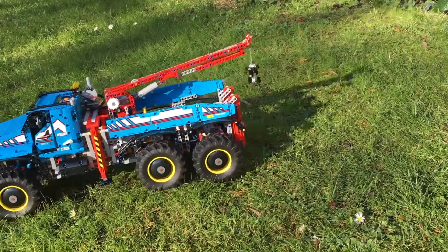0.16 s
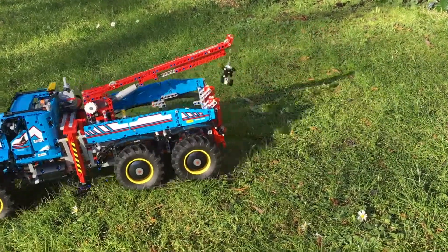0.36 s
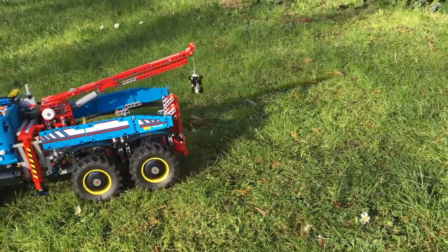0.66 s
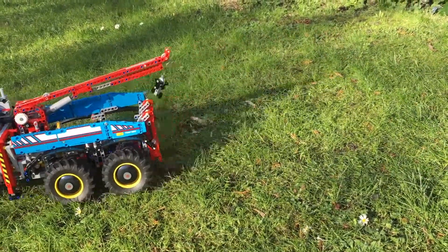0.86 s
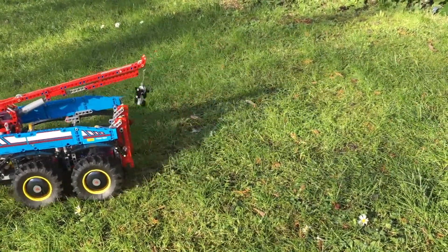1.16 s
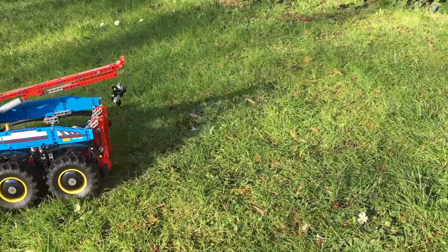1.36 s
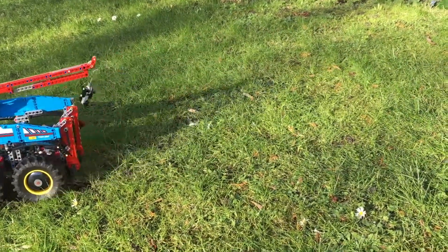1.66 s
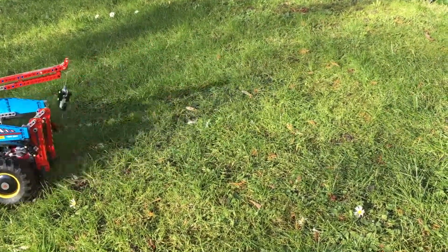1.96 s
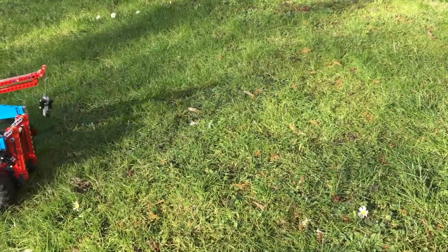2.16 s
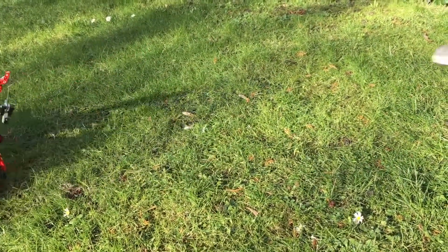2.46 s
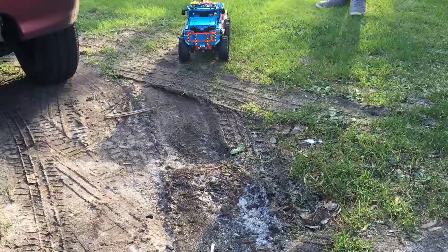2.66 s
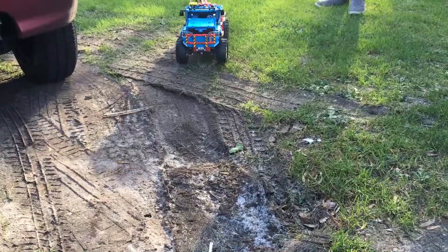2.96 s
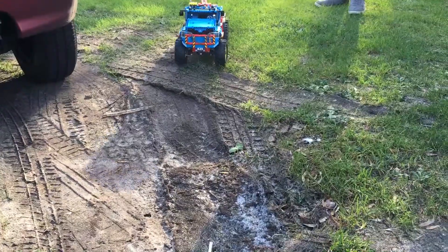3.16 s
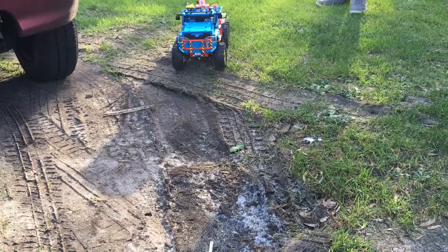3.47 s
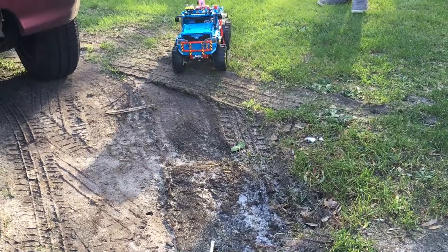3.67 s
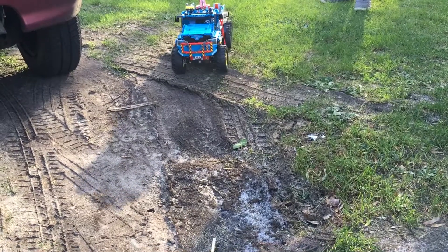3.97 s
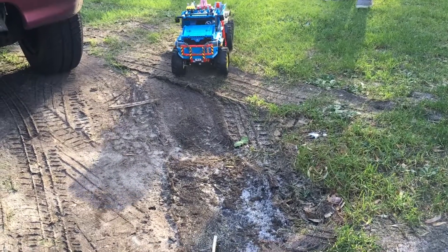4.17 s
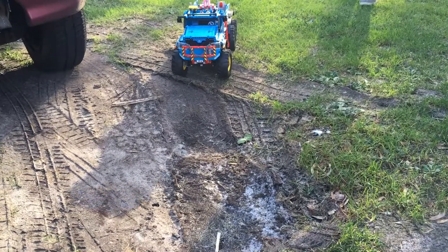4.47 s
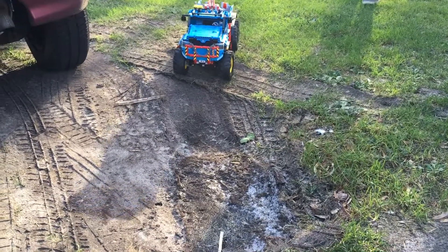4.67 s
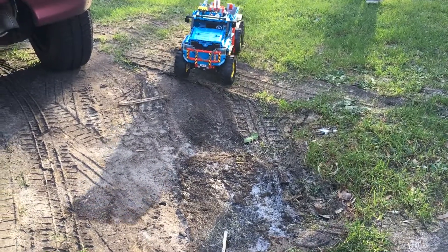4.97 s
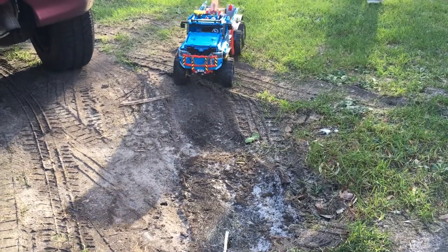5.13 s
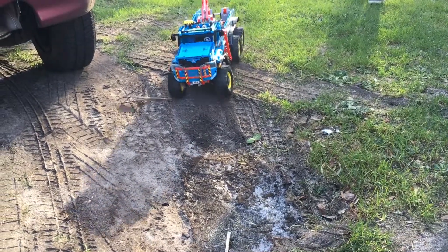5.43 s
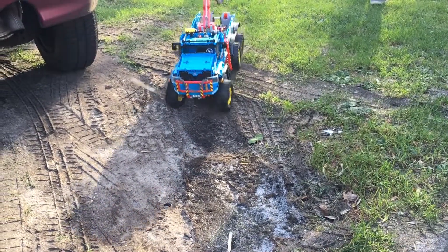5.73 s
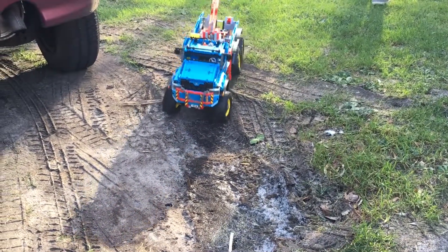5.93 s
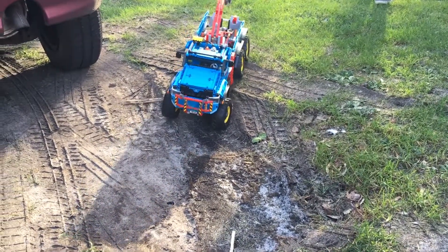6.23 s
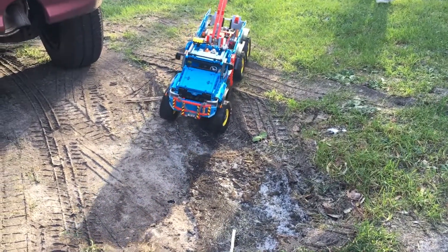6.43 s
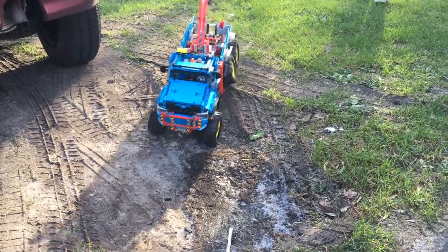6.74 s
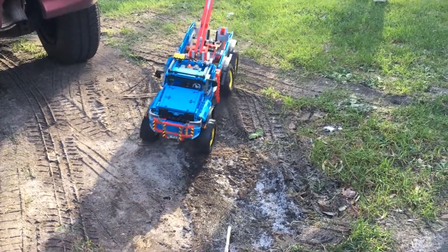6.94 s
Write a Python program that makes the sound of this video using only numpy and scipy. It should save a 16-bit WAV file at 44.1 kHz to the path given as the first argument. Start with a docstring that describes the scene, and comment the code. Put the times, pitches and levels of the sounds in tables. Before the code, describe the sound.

High bird trills and warbled chirps, near and far, above faintly whirring plastic gears, a soft hollow knock and low outdoor rumble.

```python
"""First comes a bird some way off in a garden, singing falling trills that end in a flourish. A near bird
then rocks between a warbled high note and an arched low one, and the first bird sings again. Others chip
and whistle in the trees. Each note is an almost pure, sliding tone from the bird's voice box, plus echoes.
Early on, something hollow gives one dull knock. A toy truck's plastic gears hiss faintly over a low
outdoor rumble, which turns suddenly deeper part-way through."""
import sys
import numpy as np
from scipy import signal
from scipy.fft import rfft, irfft
from scipy.io import wavfile
from scipy.ndimage import uniform_filter1d, minimum_filter1d

SR = 44100
rng = np.random.default_rng(int(sys.argv[2]) if len(sys.argv) > 2 else 0)


def transcribe(u):
    """Save the signal u as a 16-bit wav file named by the first command-line argument.

    u: samples, shape (n,) or (channels, n), limited to [-1, 1]; the rate is SR.
    q: integer samples, one column per channel.
    """
    v = np.clip(np.atleast_2d(u).T, -1, 1)
    q = np.round(v * 32767).astype(np.int16)
    wavfile.write(sys.argv[1], SR, q)


N = 313110
TIME = np.arange(N) / SR

# Levels in the tables are relative: each source also sets its own loudness.
# Shapes of smooth notes, timed from the note's main moment: t/s, level/dB as the last column, with
# f/Hz between them.
ARCH_SHAPE = [(-.054, 2900, -11), (-.04, 2990, -8.5), (-.027, 3300, 4), (-.013, 3650, 4), (0, 3853, 9),
              (.012, 3680, -2.5), (.018, 3050, -3.5), (.024, 2100, -26)]
TAG_SHAPE = [(-.019, 2270, -13.5), (-.008, 2690, -0.5), (.002, 2880, -1), (.02, 2830, -9.5)]
GLIDE_SHAPE = [(-.003, 5166, -2.5), (.009, 4750, 1.5), (.02, 4396, 2), (.034, 4332, -1), (.046, 4270, -9),
               (0.052, 3600, -11)]
DROP_SHAPE = [(-.007, 4630, -1.5), (-.003, 3645, 0.5), (.001, 3026, 0.5), (.012, 2687, -1.5),
              (.016, 2275, -13), (.024, 1570, -15.5)]
CHIP_SHAPE = [(-.015, 3490, -6), (-.007, 4880, 0), (0, 5790, -2.5), (.007, 4970, 1), (.022, 2880, -5.5)]
SEESAW_SHAPE = [(-.012, 4715, -13), (0, 5150, -4.5), (.018, 5600, 0.5), (.026, 7200, -9), (.05, 5880, -5)]
# Shapes of buzzy notes, whose pitch zigzags: t/s, f/Hz, level/dB, zigzag depth/Hz
LISP_SHAPE = [(-.045, 6900, -6, 500), (-.026, 6620, 1, 600), (-.018, 6260, -7, 500), (-.014, 3990, -9, 0),
              (0, 6200, 2, 0), (.007, 5400, 2, 150), (.018, 4700, -8, 200)]
RISE_SHAPE = [(-.02, 4605, -5.5, 400), (-.007, 4520, -6.5, 250), (0, 5300, 4, 100), (.007, 5570, -4, 300)]
SLUR_SHAPE = [(-.052, 5680, -6, 652), (-.036, 5150, -4, 704), (-.026, 4360, -1, 204),
              (-.004, 3170, -2.5, -2), (.003, 2640, -23.5, 0), (.006, 3440, -6, 0), (.014, 3860, 0.5, 145),
              (.026, 4050, -15, 150)]
FLOURISH_SHAPE = [(-.05, 5500, -17, 1280), (-.022, 6770, -14, 1190), (-.012, 4782, -15, 300),
                  (-.006, 3718, -17, 100), (.004, 4310, -6.5, 420), (.03, 3677, -10.5, 494),
                  (.06, 3200, -13.5, 453), (.12, 2894, -21, 280), (.16, 2820, -26, 200)]
# The near bird's high notes: t/s, level/dB, pitch factor, zigzag length/s, zigzag depth/Hz
HIGH_NOTES = [(2.875, -23, 0.97, 0.041, 860), (3.24, -22, .985, 0.059, 1290),
              (3.592, -23.5, 1.132, 0.044, 1400), (3.973, -27, 1.094, 0.049, 1320)]
# Single notes: t/s, level/dB, pitch factor, length factor
ARCH_NOTES = [(2.693, -30.5, 1, 0.65), (3.037, -28, 0.95, 0.89), (3.40, -24, 1, 0.92),
              (3.753, -24.5, 1.08, 1.12), (4.139, -26.5, 1.078, 1)]
TAG_NOTES = [(2.736, -39.5, 0.86, 0.84), (3.083, -40.5, 0.8, 1), (3.449, -27.5, .99, 0.96),
             (3.804, -32, 1.07, 1.3), (4.196, -34.5, 1.004, 1.7)]
CHIP_NOTES = [(1.377, -40.5, 0.98, 0.91), (1.974, -41, 1.48, 0.37), (2.033, -44, 1.2, 0.32)]
# The flourish that ends each far song: t/s, level/dB
FLOURISH_NOTES = [(1.075, -23.5), (6.85, -23.5)]
# Trills: first t/s, last t/s, note count, growth of each gap, level/dB, level change/dB, pitch factor
LISP_RUNS = [(4.472, 4.729, 3, -0.044, -40.5, 8.4, 1.01)]
RISE_RUNS = [(4.83, 5.084, 5, 0.013, -33, -1.5, 1.01)]
SLUR_RUNS = [(.047, .306, 3, -0.0058, -28.5, -2.5, 1), (5.199, 6.092, 8, 0, -27.5, -0.44, 1.027)]
DROP_RUNS = [(.381, .936, 9, 0.013, -38, 0.5, 0.99), (6.172, 6.72, 9, .027, -34.5, -4, 1)]
SEESAW_RUNS = [(.815, 1.797, 14, 0.0091, -53.5, 2.1, 1)]
# Held notes from the trees: t/s, length/s, first f/Hz, last f/Hz, level/dB
THIN_NOTES = [(2.2, 0.07, 6400, 6500, -58), (3.14, 0.4, 5780, 5600, -50), (3.163, 0.12, 6760, 6520, -37),
              (3.361, 0.094, 6650, 6680, -44), (5.053, 0.115, 3465, 3350, -51),
              (5.33, 0.23, 2496, 2503, -59.5), (5.82, 0.17, 2420, 2375, -58.5),
              (6.809, 0.28, 2404, 2390, -55.5)]
HOARSE_NOTES = [(2.06, 0.18, 1730, 1694, -63.5), (2.88, 0.22, 1580, 1710, -68),
                (3.52, 0.28, 1564, 1772, -65.5), (4.05, .48, 1740, 1566, -68)]
# The tones a hollow body rings with: f/Hz, level/dB, time to fade by 60 dB/s
BODY_TONES = [(103, -10, 0.17), (145, 1, 0.28), (365, -12.5, 0.22), (810, -15.5, 0.072)]
# Hits of the knock, the truck's loose parts and its tyres on soil: t/s, level/dB
KNOCK_HITS = [(.992, -44.5), (1.117, -34.5), (1.1385, -30), (1.1665, -34.5), (1.266, -42.5)]
TICK_HITS = [(2.03, -49), (2.09, -57), (5.195, -40.5), (6.517, -48), (6.82, -39)]
CRUNCH_HITS = [(5.283, -56.5), (6.69, -51), (6.75, -57.5)]
# Loudness of the gears (how hard the truck drives) and of the early rumble: t/s, level/dB
GEAR_LEVELS = [(0.0, -65), (.15, -58), (.42, -60), (.6, -57), (.78, -60.5), (1.1, -60), (1.25, -69.5),
               (1.4, -59.5), (1.57, -63), (1.7, -60.5), (1.82, -67), (2.06, -62), (2.28, -63.5),
               (2.48, -65.5), (2.85, -61), (3.2, -61), (4.25, -59), (4.6, -62), (5.03, -63.5), (5.3, -56),
               (5.65, -53), (6.27, -54.5), (6.44, -75), (6.6, -55.5), (6.86, -54), (7.1, -55.5)]
EARLY_RUMBLE_LEVELS = [(0.0, -56.5), (0.844, -58), (1.42, -55.5), (1.628, -57.5), (2.042, -52.5),
                       (2.1, -56), (2.444, -56.5), (2.65, -48.5)]
# Pitches at which the gears whirr: f/Hz, width/Hz, level/dB
WHIRR_BANDS = [(6350, 1050, -3), (8640, 1000, -7.5), (12070, 1360, -8.5)]
# Noise colours, or how strong each noise is from low to high: f/Hz, level/dB
THUD_SPECTRUM = [(75, -9.5), (140, 7), (200, -16.5), (400, -14.5), (650, -25), (1000, -34), (2000, -27)]
GEAR_SPECTRUM = [(600, 2), (1100, -7.5), (3000, 9.5), (6000, 8), (7800, -23), (10300, -5), (15500, 0)]
TICK_SPECTRUM = [(1200, -6), (5000, -16), (15000, -1)]
CRUNCH_SPECTRUM = [(350, 7), (800, 4), (2000, 15), (5000, -23)]
EARLY_SPECTRUM = [(52, -13), (80, -6), (144, -1), (222, -6.5), (443, -12.5), (900, -27), (1800, -30.5)]
LATE_SPECTRUM = [(31, -10.5), (52, -3), (113, -9.5), (211, -16.5), (400, -29.5), (775, -39), (1400, -29)]
CHORUS_SPECTRUM = [(1200, -11.5), (2200, -2), (3200, 12.5), (4500, 8), (6200, 0.5), (8000, -5.5),
                   (11000, -65)]
# How alike the noise is in the two ears: f/Hz, likeness from 0 to 1
EAR_LIKENESS = [(400, 1), (1400, 0.99), (3000, 0.32), (6000, 0), (9000, 1)]


def near_bird():
    """High warbles take turns with low arches, each with a short tag; leaves scatter the high ones more."""
    high = sum(sing(warbled(zigzag_s, depth_hz), [(s, db, pitch, 1)],
                    flutter_db=1, waver=.003, overtone_db=-33)
               for s, db, pitch, zigzag_s, depth_hz in HIGH_NOTES)
    low = sing(ARCH_SHAPE, ARCH_NOTES, flutter_db=1.5, waver=.007, overtone_db=-18)
    low += sing(TAG_SHAPE, TAG_NOTES)
    high = garden(high, pan_db=-5, lead_ms=.15, tail_db=-9, early_db=-9)
    return high + garden(low, pan_db=-5, lead_ms=.12, tail_db=-12.5, early_db=-11.5)


def far_birds():
    """One bird runs through trills to a buzzy flourish; a closer one chips between its songs."""
    song = sing(LISP_SHAPE, trill(LISP_RUNS), warble_hz=207, waver=.0221)
    song += sing(RISE_SHAPE, trill(RISE_RUNS), warble_hz=202.4, flutter_db=3, waver=.024)
    song += sing(SLUR_SHAPE, trill(SLUR_RUNS), warble_hz=161.5, flutter_db=3.5, waver=.0147)
    song += sing(FLOURISH_SHAPE, FLOURISH_NOTES, warble_hz=149.8, waver=.0213)
    song += sing(DROP_SHAPE, trill(DROP_RUNS), flutter_db=1, waver=.016)
    song = from_db(-5) * garden(song, pan_db=11, lead_ms=.075, tail_db=-1, early_db=-9)
    chips = sing(CHIP_SHAPE, CHIP_NOTES, flutter_db=3)
    return song + garden(chips, pan_db=6, lead_ms=.061, tail_db=-4, early_db=-6.5)


def seesaw_bird():
    """A faint high trill from farther off, each note sliding up and then down."""
    song = sing(SEESAW_SHAPE, trill(SEESAW_RUNS), waver=.025)
    return garden(song, pan_db=-5, lead_ms=.026, tail_db=-6, early_db=-6.5)


def whistling_birds():
    """Thin whistles and low calls from deep in the trees; a shakier pitch makes the low ones hoarse."""
    song = np.zeros(N)
    for notes, waver in (THIN_NOTES, .014), (HOARSE_NOTES, .05):
        for s, length, first_hz, last_hz, db in notes:
            shape = [(0, first_hz, -12), (length / 4, first_hz, 0), (length, last_hz, -6)]
            song += sing(shape, [(s, db)], waver=waver)
    return garden(song, pan_db=5.5, lead_ms=.053, tail_db=-4.5, early_db=-13.5)


def high_tone(start_s=6.345, end_s=6.7, rise_s=.055, fall_s=.09):
    """A thin, fluttering tone swells, holds and fades."""
    swell = np.clip(np.minimum((TIME - start_s) / rise_s, (end_s - TIME) / fall_s), 0, 1)
    hz = 5390 * (1 + .005 * drift(200))
    return swell * from_db(-52.5 + 3.5 * drift(80)) * np.sin(2 * np.pi * np.cumsum(hz) / SR)


def knock():
    """A few quick, soft hits set a hollow body ringing, each with a dull puff of noise."""
    hits = strikes(KNOCK_HITS)
    body = sum(from_db(db) * ring(hits, hz, t60) for hz, db, t60 in BODY_TONES)
    puff = uniform_filter1d(fade(hits, t60=.39), size=500) * noise(THUD_SPECTRUM)
    thump = from_db(-.5) * body + from_db(-5.5) * puff
    return signal.sosfilt(signal.butter(4, 65, "high", fs=SR, output="sos"), thump)


def toy_truck():
    """Plastic gears hiss and whirr, each whirr coming and going; loose parts tick and tyres crunch."""
    gears = noise(GEAR_SPECTRUM)
    for hz, width_hz, db in WHIRR_BANDS:
        band = signal.lfilter(*signal.iirpeak(hz, hz / width_hz, fs=SR), rng.standard_normal(N))
        gears += from_db(db + 4.74 * drift(7.7)) * rms_one(band)
    flicker_db = 1.38 * drift(150) + .27 * drift(25)
    gears *= level(GEAR_LEVELS) * from_db(3.5 + flicker_db)
    ticks = fade(strikes(TICK_HITS), t60=.035) * noise(TICK_SPECTRUM)
    crunch_gain = fade(strikes(CRUNCH_HITS), t60=.23) * from_db(.76 * drift(410))
    return gears + ticks + crunch_gain * noise(CRUNCH_SPECTRUM)


def rumble(change_s=2.665, blend_s=.0078):
    """A low outdoor rumble suddenly gives way to a deeper one."""
    late_share = np.clip((TIME - change_s) / blend_s + .5, 0, 1)
    early = level(EARLY_RUMBLE_LEVELS) * noise(EARLY_SPECTRUM)
    late = from_db(-57) * noise(LATE_SPECTRUM)
    return (1 - late_share) * early + late_share * late


def distant_chorus():
    """Many far-off birds blur into a soft hiss that swells and sinks."""
    return from_db(-56 + 2.2 * drift(8)) * noise(CHORUS_SPECTRUM)


def sing(shape, notes, warble_hz=72, flutter_db=4, waver=.012, overtone_db=-42):
    """A bird's voice box slides a tone through a shape; a fast muscle tremor can zigzag its pitch."""
    out = np.zeros(N)
    shape_s, *columns = np.transpose(shape)
    for s, db, *factors in notes:
        pitch, length = factors or (1, 1)
        t = np.arange(shape_s[0] * length, shape_s[-1] * length, 1 / SR)
        hz, shape_db, *depth = (np.interp(t / length, shape_s, column) for column in columns)
        flutter, wobble = drift(247, size=len(t)), drift(300, size=len(t))
        zigzag_hz = -sum(depth) * signal.sawtooth(2 * np.pi * warble_hz * t, .5)   # 0 in smooth notes
        phase = 2 * np.pi * np.cumsum(pitch * hz * (1 + waver * wobble) + zigzag_hz) / SR
        # an overtone at three times the pitch shows only where the note is loudest
        overtone_gain = from_db(overtone_db + 3 * (shape_db - shape_db.max())) * (pitch * hz < SR / 8)
        tone = np.sin(phase) + overtone_gain * np.sin(3 * phase)
        soft_edges = signal.windows.tukey(len(t), .08)
        add(out, s + t[0], soft_edges * from_db(db + shape_db + flutter_db * flutter) * tone)
    return out


def warbled(zigzag_s, depth_hz, centre_hz=4840, rise_s=.012):
    """The shape of a high note: the pitch zigzags, narrows and settles into a downward glide."""
    zigzag = [(-zigzag_s, centre_hz, -17, depth_hz),
              (rise_s - zigzag_s, centre_hz, -4, depth_hz),
              (-.014, centre_hz, -1, .7 * depth_hz)]
    return zigzag + [(*point, 0) for point in GLIDE_SHAPE]


def trill(runs, pitch_sag=.04):
    """A bird repeats one note, sinking a little in pitch and never twice quite alike."""
    notes = []
    for first_s, last_s, count, gap_growth, db, change_db, pitch in runs:
        gaps = (1 + gap_growth) ** np.arange(round(count) - 1)
        progress = np.append(0, np.cumsum(gaps)) / gaps.sum()
        chance = 1 + rng.standard_normal((len(progress), 2)) * [.012, .06]
        for part, (detune, length) in zip(progress, chance):
            s = first_s + part * (last_s - first_s)
            notes.append((s, db + part * change_db, pitch * (1 - pitch_sag * part) * detune, length))
    return notes


def garden(x, pan_db, lead_ms, tail_db, early_db, tail_t60=.77, early_t60=.034, echo_pan=.51):
    """Sound reaches the left ear first; ground and walls echo early, and trees scatter a long tail."""
    sides_db = np.array([[pan_db], [-pan_db]]) / 2   # positive pan is louder on the left
    direct = np.array([x, np.interp(TIME - lead_ms / 1000, TIME, x)]) * from_db(sides_db)
    t = np.arange(SR) / SR
    scatter = rng.standard_normal((2, 2, SR)) * (t > .004)   # echoes start after 4 ms
    tail = from_db(tail_db) * rms_one(scatter[0] * from_db(-60 * t / tail_t60))
    early = from_db(early_db) * rms_one(scatter[1] * from_db(-60 * t / early_t60))
    echoes = signal.fftconvolve(x[None], (tail + early) / np.sqrt(SR), axes=1)[:, :N]
    return direct + echoes * from_db(echo_pan * sides_db)


def strikes(hits):
    """One click for each hit."""
    out = np.zeros(N)
    for s, db in hits:
        out[round(s * SR)] += from_db(db)
    return out + 1e-18


def fade(clicks, t60):
    """A loudness curve that jumps at each click, then falls by 60 dB in t60 seconds."""
    return signal.lfilter([1], [1, -np.exp(-np.log(1000) / (t60 * SR))], clicks)


def ring(clicks, hz, t60):
    """Each click starts a pure tone that dies away."""
    decay, step = np.exp(-np.log(1000) / (t60 * SR)), 2 * np.pi * hz / SR
    return signal.lfilter([0, np.sin(step)], [1, -2 * decay * np.cos(step), decay * decay], clicks)


def noise(spectrum):
    """Stereo noise of a given colour and of strength 1, alike in both ears in the bass."""
    hz = np.arange(N // 2 + 1) * SR / N
    alike = np.clip(at_hz(EAR_LIKENESS, hz), 0, 1)
    bass_cut = 1 + (spectrum[0][0] / (hz + 1)) ** 8
    treble_cut = 1 + (hz / spectrum[-1][0] / 1.2) ** 8
    colour = from_db(at_hz(spectrum, hz)) / np.sqrt(bass_cut * treble_cut)
    mid, side = rfft(rng.standard_normal((2, N))) * colour
    return rms_one(irfft(np.sqrt(1 + alike) * mid + np.sqrt(1 - alike) * side * [[1], [-1]], N))


def drift(rate, size=N):
    """A random wander of about 1 either way, turning rate times a second."""
    return np.interp(np.arange(size) / SR * rate, np.arange(8000), rng.standard_normal(8000))


def add(out, start_s, sound):
    """Mix a sound in at a given time."""
    at = round(start_s * SR) + np.arange(len(sound))
    inside = (at >= 0) & (at < N)
    out[at[inside]] += sound[inside]


def level(rows):
    """Join t/s, level/dB points into a loudness curve."""
    return from_db(np.interp(TIME, *np.transpose(rows)))


def at_hz(points, hz):
    """Read between a table's frequencies, giving each octave equal room."""
    table_hz, value = np.transpose(points)
    return np.interp(np.log(hz + 1), np.log(table_hz), value)


def from_db(db):
    """Turn decibels into a number to multiply by."""
    return 10 ** (np.asarray(db) / 20)


def rms_one(x):
    """Scale a sound to an average strength (rms) of 1."""
    return x / np.sqrt(np.mean(x ** 2) + 1e-20)


def scene():
    """All the sounds together at the microphone."""
    birds = near_bird() + far_birds() + seesaw_bird() + whistling_birds()
    return birds + high_tone() + knock() + toy_truck() + rumble() + distant_chorus()


def record(dry):
    """A fast limiter turns the loudest notes down, and the highest treble is cut steeply."""
    ceiling, cutoff_hz = .16, 15900
    needed_gain = ceiling / np.maximum(np.abs(dry).max(axis=0), ceiling)
    smooth_gain = uniform_filter1d(minimum_filter1d(needed_gain, size=200), size=200)
    return signal.sosfilt(signal.ellip(12, .1, 70, cutoff_hz, fs=SR, output="sos"), dry * smooth_gain)


dry = scene()
out = record(dry)
transcribe(out)
```